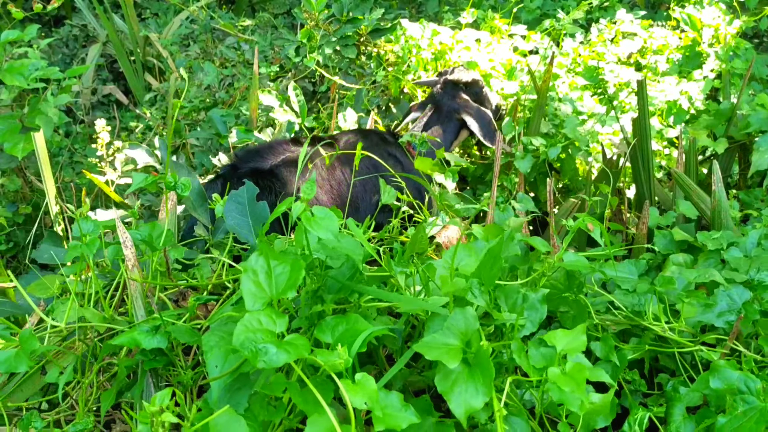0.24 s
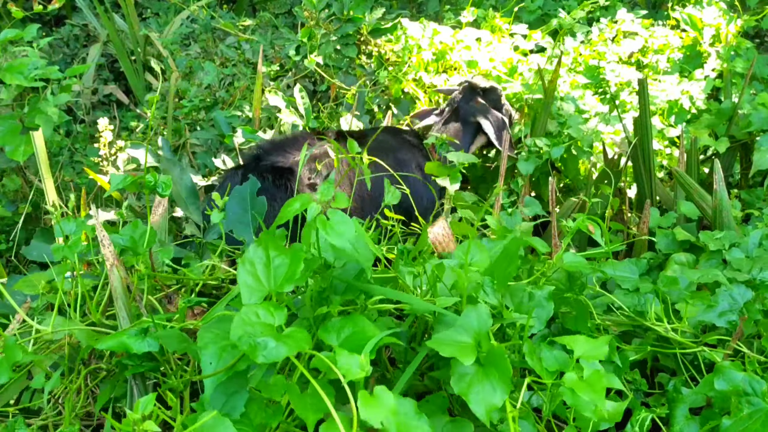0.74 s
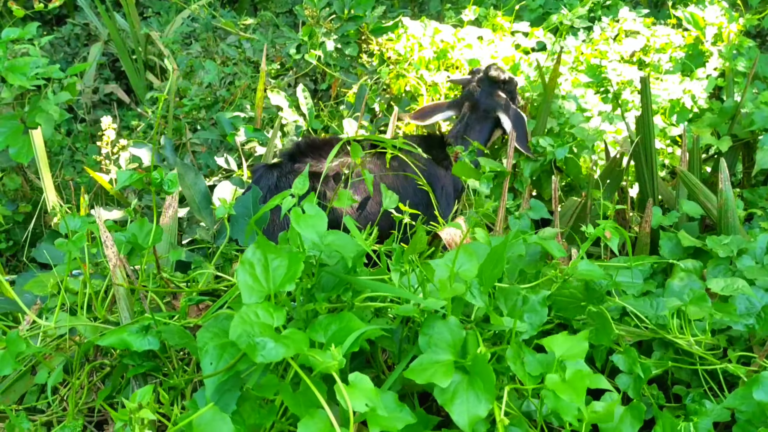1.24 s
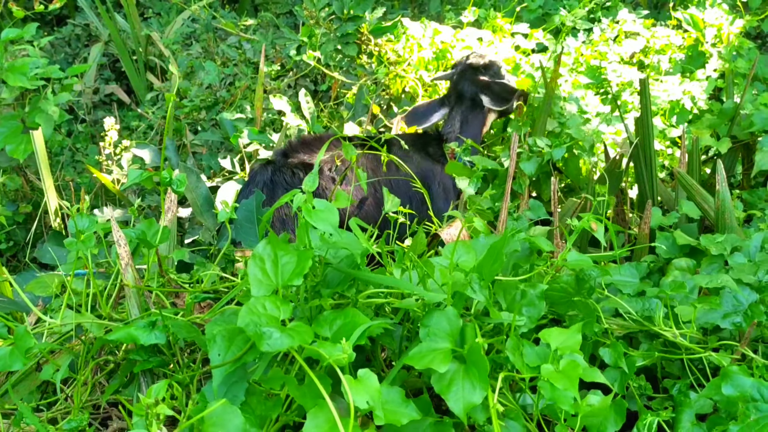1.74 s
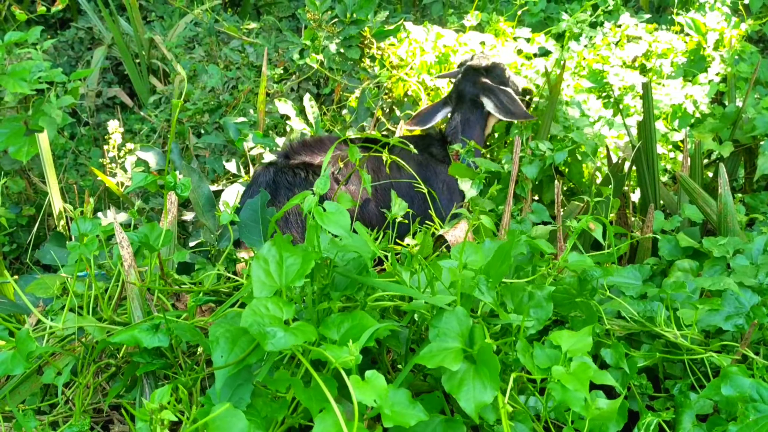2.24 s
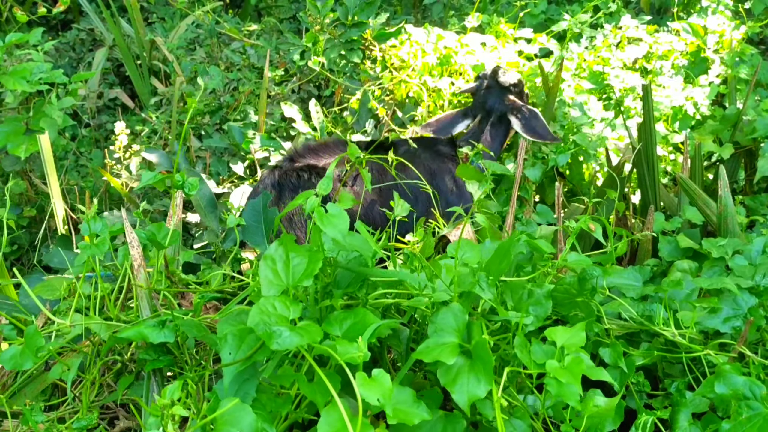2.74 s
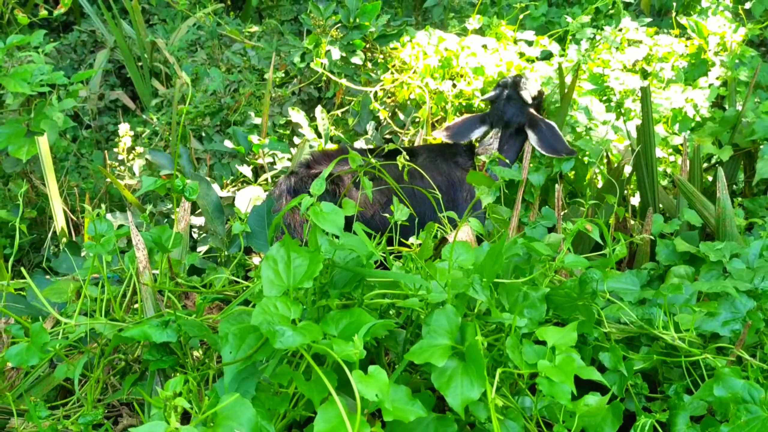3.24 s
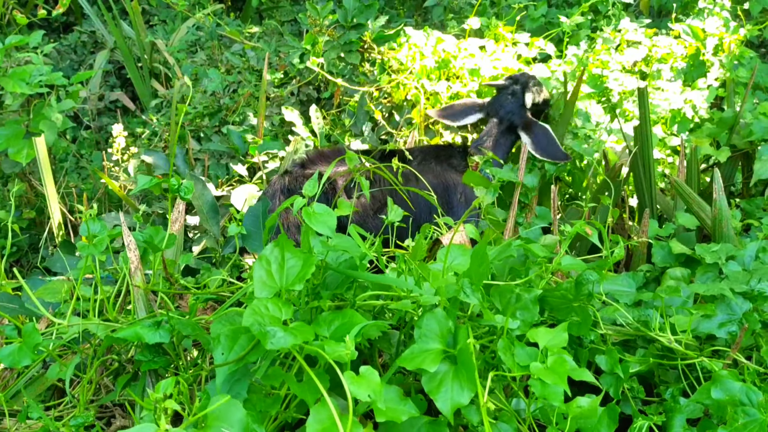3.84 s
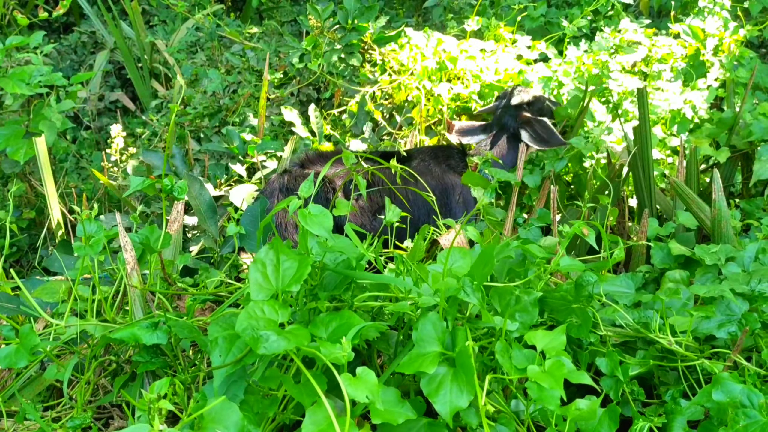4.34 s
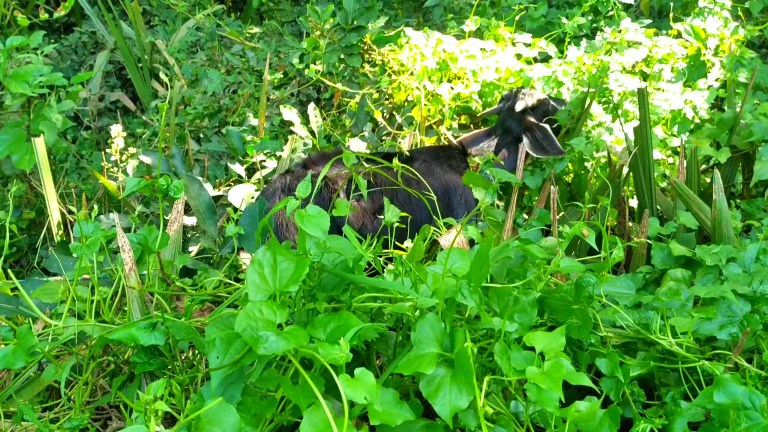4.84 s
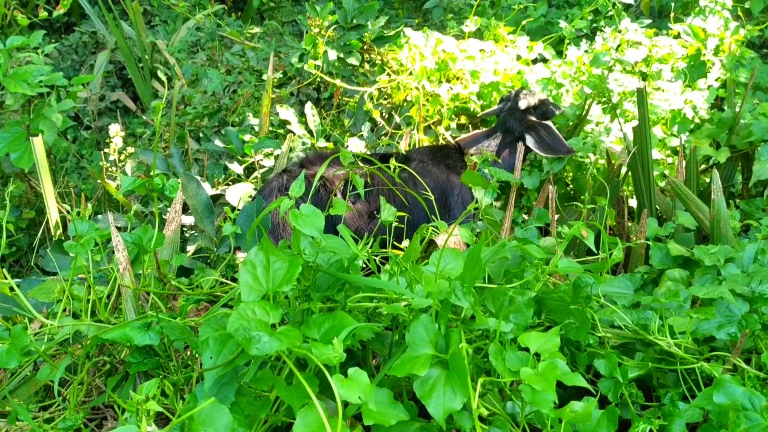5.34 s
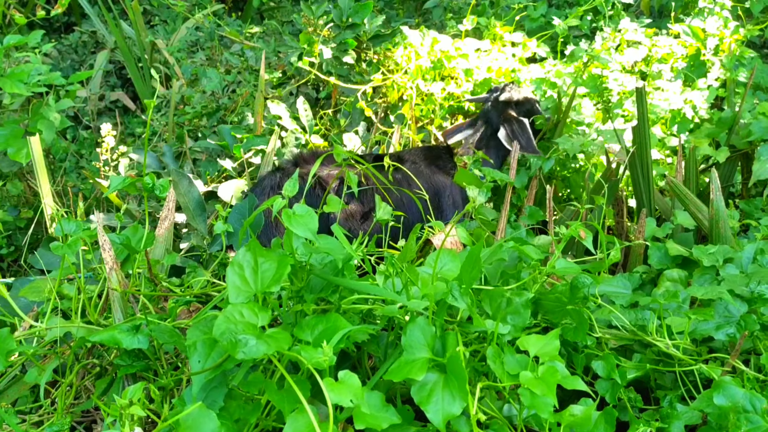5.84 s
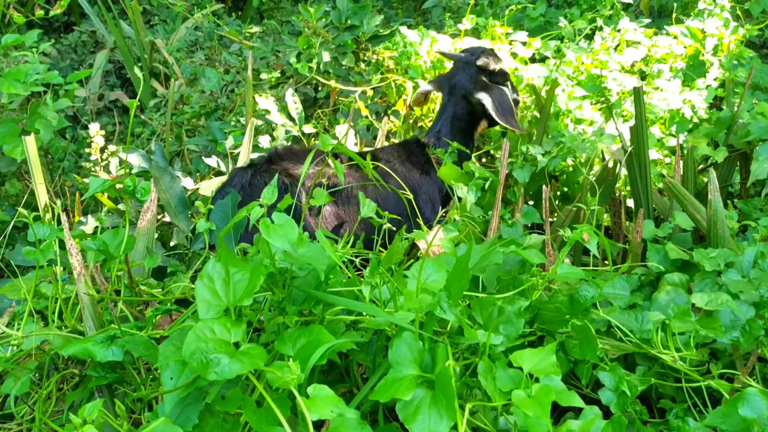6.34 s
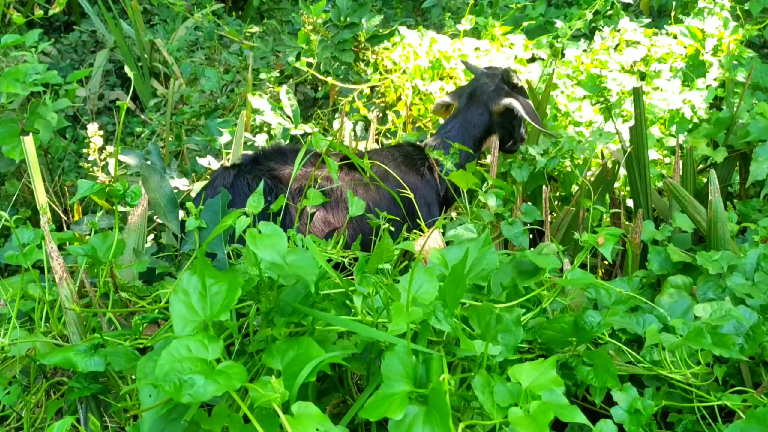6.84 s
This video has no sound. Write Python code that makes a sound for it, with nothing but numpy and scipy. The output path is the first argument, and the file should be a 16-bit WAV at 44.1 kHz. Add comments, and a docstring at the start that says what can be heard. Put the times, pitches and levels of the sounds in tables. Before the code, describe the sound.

A goat pushes through thick undergrowth with leafy crackles and crisp snaps, above a soft outdoor rumble and thin, high insects.

```python
"""Leaves drag and crackle over a low outdoor rumble: a goat browses in dense weeds a few metres away.
A distant engine hums; insects scrape a thin buzz from their wings, one later in even chirps.
Stems snap as their fibres tear, and a few dull knocks sound in the undergrowth.
The plants scatter a short tail; the small microphone's port resonances colour it all."""
import sys
import numpy as np
from scipy import signal
from scipy.fft import rfft, irfft
from scipy.io import wavfile

SR = 44100
rng = np.random.default_rng(int(sys.argv[2]) if len(sys.argv) > 2 else 0)


def dump_mix(stems):
    """Bounce the given channels to the path in sys.argv[1] as a 16-bit WAV at rate SR."""
    frames = np.atleast_2d(stems).T  # one column per channel
    limited = np.clip(frames, -1, 1)  # hard clip at full scale
    pcm = np.round(limited * 32767).astype(np.int16)
    wavfile.write(sys.argv[1], SR, pcm)


N = 312228
TIME = np.arange(N) / SR
STEM_HZ = 2500  # ring of a usual stem


def amp(db):
    """Decibels to gain."""
    return 10 ** (np.asarray(db) / 20)


def unit(x):
    """Scale to rms 1."""
    return x / np.sqrt(np.mean(x ** 2) + 1e-20)


def curve(rows):
    """Join (seconds, value) rows by straight lines."""
    return np.interp(TIME, *np.transpose(rows))


def spectrum(points, hz):
    """Read (Hz, dB) points on a log-frequency axis."""
    points_hz, db = np.transpose(points)
    return np.interp(np.log(hz + 1), np.log(points_hz), db)


def bins(x):
    """FFT bin frequencies of x in Hz."""
    return np.fft.rfftfreq(len(x), 1 / SR)


def colour(x, db):
    """Minimum-phase filter with gain db at each bin."""
    cepstrum = irfft(db * np.log(10) / 20, len(x))
    cepstrum[1:len(x) // 2] *= 2
    cepstrum[len(x) // 2 + 1:] = 0
    return irfft(rfft(x) * np.exp(rfft(cepstrum)), len(x))


def ring(x, hz, width_hz):
    """One resonance."""
    radius = np.exp(-np.pi * width_hz / SR)
    return signal.lfilter([1 - radius], [1, -radius * np.exp(2j * np.pi * hz / SR)], x).real


def drift(rate_hz):
    """Slow random wander, rms 1."""
    lowpass = np.exp(-(bins(TIME) / rate_hz) ** 2)
    return unit(irfft(rfft(rng.standard_normal(N)) * lowpass, N))


def treble_octaves(hz):
    """Octaves above 3500 Hz; flat in the bass."""
    return np.log2(np.maximum(hz, 1500) / 3500)


def add(mix, start_s, sound):
    """Mix a sound in place."""
    part = mix[round(start_s * SR):][:len(sound)]
    part += sound[:len(part)]


def push(t, start_s, length_s, attack_s=0.048, settle_s=0.054):
    """Leaves speed up as the goat pushes, then swing to rest."""
    rise = np.clip((t - start_s) / attack_s, 0, 1)
    return rise * np.exp(-np.maximum(t - start_s - length_s, 0) / settle_s)


def leaf_motion(t, stir_db=-65.5, stir_db_per_oct=0.5):
    """Gain and treble slope of the rustle: pushes add in power over a constant faint stir."""
    # Each row: start in seconds, time in motion in seconds, relative level in dB, slope in dB/octave.
    pushes = [(-.04, 0.074, -50, 0.4), (.11, 0.1, -51, -0.3), (.18, .21, -48.5, 0.8),
              (.41, 0.058, -45.5, 0.9), (.53, 0.19, -52, 0), (.675, 0.24, -44, 0.4),
              (.93, 0.22, -46.5, 2.5), (1.12, 0.027, -65, -17), (1.318, 0.041, -58, 0.5),
              (1.5, 0.15, -59.5, 1), (1.66, 0.073, -54.5, -0.5), (1.86, 0.063, -58.5, 3),
              (2.21, .21, -55.5, -.3), (2.44, .23, -51.5, 0), (2.74, 0.18, -51.5, -0.4),
              (2.981, .37, -55.5, -0.5), (3.42, 0.022, -56.5, 0.5), (3.59, 0.12, -64, -3),
              (3.79, .26, -65, -2.5), (4.19, 0.083, -62.5, -6.5), (4.46, 0.036, -64, 2),
              (5.02, .05, -57.5, -.2), (5.55, .06, -61.5, 0), (5.77, .25, -60.5, -1),
              (6.04, 0.6, -56, -1.1), (6.6, 0.31, -57.5, -0.5)]
    stir = np.full(len(t), amp(stir_db))
    gains = [amp(db) * push(t, start_s, length_s) for start_s, length_s, db, _ in pushes]
    powers = np.array([stir] + gains) ** 2
    slopes = np.array([stir_db_per_oct] + [slope for *_, slope in pushes])
    return np.sqrt(powers.sum(0)), slopes @ powers / powers.sum(0)


def rustle(ticks_per_s=2000, spread_db=3.5, pitched_db=6, rub_db=-1, clump_db=1, gain_db=-3):
    """Leaf edges catch and slip: clumps of tiny ticks over smooth rubbing noise."""
    # Each row: frequency in Hz, gain of a rubbing leaf in dB.
    leaf_eq = [(100, -13), (250, 5.5), (400, -7), (560, 4), (800, 0.5), (1600, -0.5), (2800, 1.5),
               (5500, 0), (10000, 0), (12000, -1.5), (16000, 1.5)]
    ticks = rng.random(N) < ticks_per_s / SR
    ticks = ticks * amp(spread_db * np.minimum(rng.exponential(1, N), 4))
    pitches_hz, t = np.geomspace(1000, 15000, 90), TIME[:512]
    leaf = rng.integers(0, len(pitches_hz), N)
    crackle = np.zeros(N)
    for k, hz in enumerate(pitches_hz):
        # each leaf flutters briefly and favours its own pitch
        flutter = unit(rng.standard_normal(len(t)) * np.exp(-t / 0.0015))
        tone = unit(ring(flutter, hz, 300 + hz / 12)) * np.sqrt(hz / pitches_hz.mean())
        crackle += signal.oaconvolve(ticks * (leaf == k), flutter + amp(pitched_db) * tone)[:N]
    rub = amp(rub_db) * rng.standard_normal(N)
    leaves = (unit(crackle) + rub) * amp(clump_db * drift(rate_hz=50))
    hz, frame_s, frames = signal.stft(unit(leaves), SR, nperseg=512)
    gain, db_per_oct = leaf_motion(frame_s)
    eq_db = spectrum(leaf_eq, hz)[:, None] + treble_octaves(hz)[:, None] * db_per_oct
    shaped = signal.istft(frames * amp(eq_db), SR, nperseg=512)[1][:N]
    return shaped * np.interp(TIME, frame_s, gain) * amp(gain_db)


def air(level_db=-55.5, swell_db=0.64):
    """Low outdoor rumble with thin hiss; gusts nudge the microphone."""
    # Each row: frequency in Hz, relative spectral density in dB.
    still_air = [(10, -3), (30, 0), (58, 1.5), (80, -1.5), (115, -5), (150, -9.5), (220, -16), (400, -23.5),
                 (700, -31), (1500, -30.5), (5000, -34.5), (10000, -30.5), (15000, -44)]
    # Each row: peak time in seconds, level in dB, Gaussian width in seconds.
    gusts = [(1.417, -63, 0.033), (3.706, -47, 0.037)]
    wash = unit(colour(rng.standard_normal(N), spectrum(still_air, bins(TIME))))
    wash *= amp(level_db + swell_db * drift(rate_hz=3.8))
    gust_gain = sum(amp(db) * np.exp(-((TIME - at_s) / width_s) ** 2 / 2) for at_s, db, width_s in gusts)
    gust_band = signal.butter(2, [22, 42], "band", fs=SR, output="sos")
    buffet = unit(signal.sosfilt(gust_band, rng.standard_normal(N)))
    return wash + gust_gain * buffet


def engine(firing_hz=93.26, waver=0.00586, trim_db=-0.03, octave_db=-68.0, octave_db_per_s=-1.68):
    """Only two harmonics carry this far; the fundamental swells and fades, the upper flutters on its own and
    slowly recedes."""
    # Each row: time in seconds, level of the fundamental before trim in dB.
    swells = [(0.0, -58), (0.72, -54.0), (1.38, -66.5), (1.5, -60), (1.98, -54.5), (2.1, -59.5),
              (2.28, -53.5), (2.64, -67.5), (4.14, -59.5), (4.62, -51.5), (4.92, -61), (5.04, -55),
              (5.7, -71), (5.82, -57.5), (6.06, -54.5), (6.36, -69), (6.84, -56), (7.08, -61)]
    phase = 2 * np.pi * np.cumsum(firing_hz * (1 + waver * drift(rate_hz=5.84))) / SR
    fundamental = amp(curve(swells) + trim_db) * np.sin(phase)
    flutter = 1 + .45 * drift(rate_hz=8)
    octave = amp(octave_db + octave_db_per_s * TIME) * flutter * np.sin(2 * phase)
    return np.sqrt(2) * (fundamental + octave)


def wing(hz, width_hz):
    """Irregular scraping buzzes an insect's wing at its resonance."""
    return unit(ring(ring(rng.standard_normal(N), hz, width_hz), hz, width_hz))


def insects(chorus_db=-66.5, throb_db=1.6, chirp_gain_db=-4.5, period_s=.1376, depth=0.52, uneven_db=1):
    """Wings buzz in a steady far chorus; one nearer insect chirps evenly."""
    # Each row: time in seconds, relative level of the near insect in dB.
    chirper = [(2.18, -88), (2.28, -61.5), (3.5, -63), (4.3, -59.5), (4.75, -62), (5.5, -57.5), (6.27, -61),
               (6.36, -90)]
    chorus = unit(wing(8416, 510) + amp(-11) * wing(8480, 35))
    chorus *= amp(chorus_db + throb_db * drift(rate_hz=71))
    beat = np.cos(np.pi * (TIME - 2.29) / period_s) ** 2
    voice = unit(wing(8735, 250) + amp(-3.5) * wing(8490, 220))
    voice_db = curve(chirper) + chirp_gain_db + uneven_db * drift(rate_hz=8.5)
    return chorus + voice * (1 - depth + depth * beat) * amp(voice_db)


def nibbles(count=22, relative_db=-55, tear_s=.004, ring_db=-4, top_hz=10000):
    """Rows for snaps(): the goat nibbles stems of any thickness at random times."""
    return [(when * TIME[-1], relative_db, tear_s, STEM_HZ * (top_hz / STEM_HZ) ** thinness, ring_db)
            for when, _, thinness in rng.random((count, 3))]


def snaps(fibre_db=6, stem_q=4.6, usual_db_per_oct=1.27, attack_s=0.000061, gain_db=-3):
    """Fibres give way in a quick dying run of clicks, which rings the stem."""
    # Each row: start in seconds, relative level in dB, tear time in seconds, ring in Hz,
    # ring over crack in dB.
    breaks = [ (.116, -42, 0.016, 5500, -16), (.238, -44.5, 0.006, 2250, 3), (.388, -42, 0.0032, 3420, 11),
              (.431, -37, 0.0037, 9570, -5), (.449, -33, 0.0063, 9600, 2), (.5996, -35, .0037, 2770, -5.5),
              (.6194, -39, 0.0022, 4700, 3), (0.962, -41, 0.011, 4360, -14),
              (1.051, -39.5, 0.014, 3070, -8), (1.0827, -36, 0.0067, 2470, 1),
              (1.2456, -39.5, 0.0014, 6700, -3), (1.513, -46, 0.0054, 6850, 0),
              (1.705, -48, .018, 2500, -10.5), (1.89, -51.5, 0.004, 2410, -7),
              (2.159, -53.5, 0.0036, 2400, 2), (2.552, -46.5, 0.0097, 2500, -14),
              (2.643, -43, .007, 2410, -14), (3.034, -47, 0.0053, 2490, -15),
              (3.1203, -38, 0.0033, 2480, 3), (3.1765, -37.5, 0.0035, 6700, 4),
              (3.1932, -43, .0044, 2450, -15), (3.2779, -37.5, 0.0059, 4190, -11),
              (3.3149, -46, .0096, 3830, 8), (3.3268, -38.5, 0.0058, 2700, -19),
              (3.4516, -42.5, .0051, 13460, 23), (3.6661, -48, 0.0045, 2240, 8),
              (3.8587, -44.5, 0.0035, 2560, -5), (3.9693, -44, 0.0028, 7300, 2),
              (4.049, -52.5, .005, 2530, -17), (4.4054, -48.5, .006, 10000, -17),
              (4.9615, -49, .004, 10500, -6), (5.133, -36.5, 0.0067, 2600, -7.5),
              (5.1523, -32, 0.0036, 3300, -4), (5.592, -53, 0.0073, 6810, -2),
              (6.0533, -28, 0.0021, 7060, -7), (6.1794, -46, 0.013, 4600, -7), (6.397, -51, .0088, 745, -6),
              (6.8932, -37, 0.0022, 5130, 11.5)]
    # Each row: frequency in Hz, gain in dB. Stems are too thin to give much bass.
    crack_eq = [(100, -8), (300, -11), (900, 2.5), (2400, 4), (6000, 2.5), (11000, 3), (16000, -3.5)]
    out, t = np.zeros(N), TIME[:4096]
    for start_s, db, tear_s, hz, ring_db in breaks + nibbles():
        # thinner stems ring higher and crack brighter
        db_per_oct = usual_db_per_oct + 3 * np.log2(hz / STEM_HZ)
        noise, size = rng.standard_normal((2, len(t)))
        envelope = np.exp(-(t / tear_s) ** 1.27) * (1 - np.exp(-t / attack_s))
        fibres = np.tanh(noise) * amp(fibre_db * np.clip(size, -1, 1)) * envelope
        crack = colour(fibres, db_per_oct * treble_octaves(bins(t)) + spectrum(crack_eq, bins(t)))
        snap = unit(crack) + amp(ring_db) * unit(ring(fibres, hz, hz / stem_q))
        add(out, start_s, amp(db + gain_db) * unit(snap) * np.sqrt(np.mean(envelope ** 2)))
    return out


def knocks(decay_s=0.0029):
    """Soft low blows in the undergrowth die within a few cycles."""
    # Each row: start in seconds, level in dB, pitch in Hz.
    blows = [(1.076, -50.5, 236), (3.323, -56.5, 298), (6.485, -58, 364)]
    out, t = np.zeros(N), TIME[:2048]
    envelope = t / decay_s * np.exp(1 - t / decay_s)
    for start_s, db, hz in blows:
        body = unit(ring(rng.standard_normal(len(t)), hz, hz / 2))
        add(out, start_s, amp(db) * envelope * body)
    return out


def thicket(x, t60_s=0.08, wet_db=-9, predelay_s=.002):
    """Surrounding plants scatter a short, faint tail."""
    t = TIME[:SR // 4]
    tail = rng.standard_normal(len(t)) * amp(-60 * t / t60_s) * (t > predelay_s)
    return x + amp(wet_db) * signal.oaconvolve(x, tail / np.linalg.norm(tail))[:N]


def scene():
    """The goat in the weeds and the surroundings, mono."""
    goat = thicket(rustle() + snaps() + knocks())
    return (goat + insects() + engine() + air())[None]


def record(dry):
    """Microphone port resonances, then the band limit."""
    # Each row: centre in Hz, width in Hz, boost in dB.
    port = [(724, 270, 5), (1170, 260, 5), (2410, 820, 6), (4550, 1170, 4), (6700, 1200, 2.5),
            (9690, 3300, 4.5)]
    port_db = sum(db * np.exp(-2 * ((bins(TIME) - hz) / width_hz) ** 2) for hz, width_hz, db in port)
    lowpass = signal.firwin(511, cutoff=15700, window=("kaiser", 9), fs=SR)
    return signal.oaconvolve(colour(dry[0], port_db), lowpass, "same")[None]


dry = scene()
out = record(dry)
dump_mix(out)
```